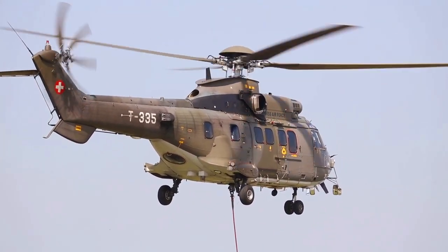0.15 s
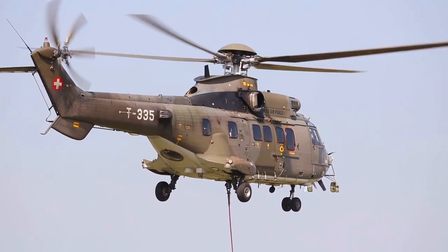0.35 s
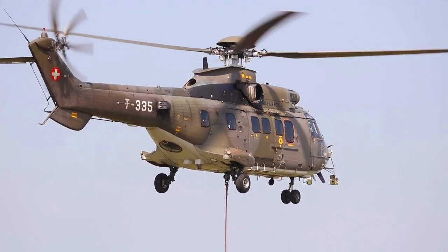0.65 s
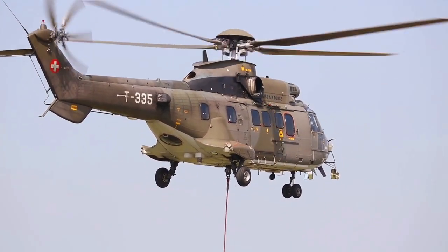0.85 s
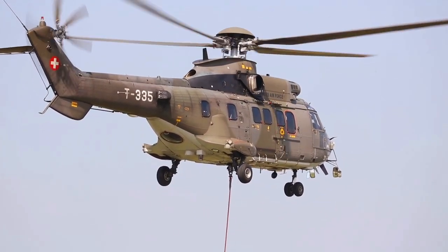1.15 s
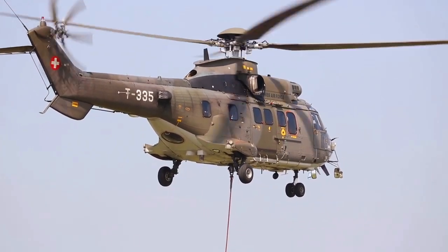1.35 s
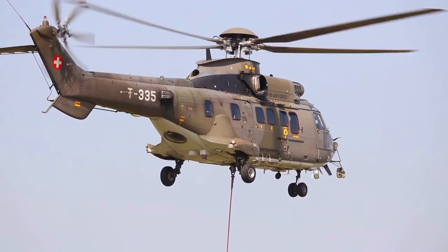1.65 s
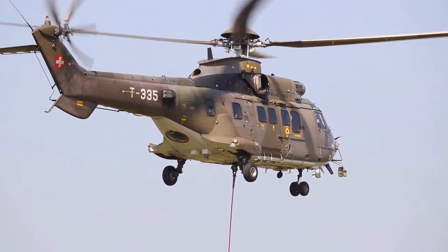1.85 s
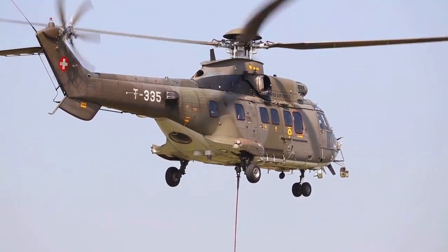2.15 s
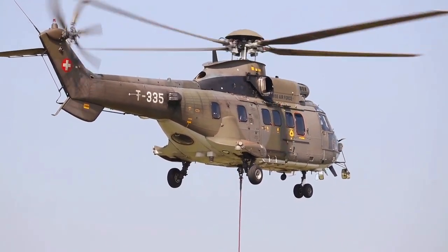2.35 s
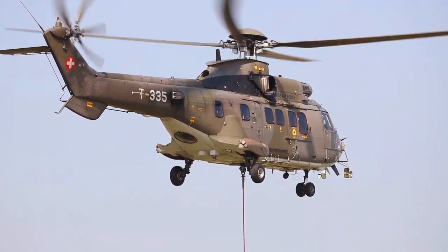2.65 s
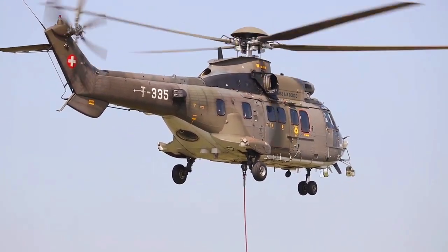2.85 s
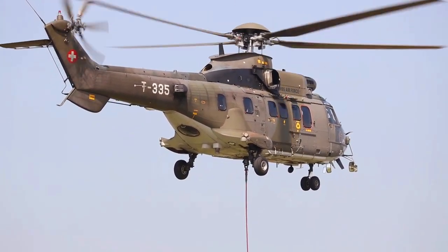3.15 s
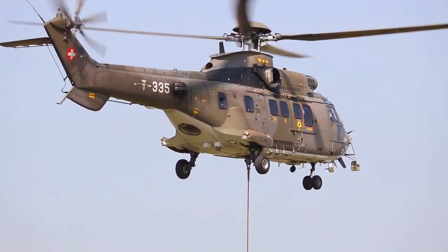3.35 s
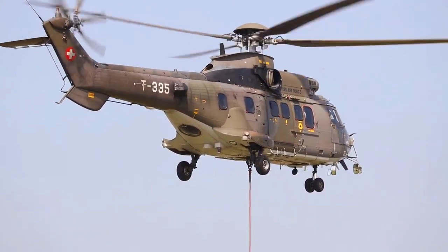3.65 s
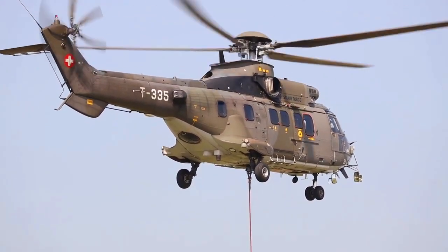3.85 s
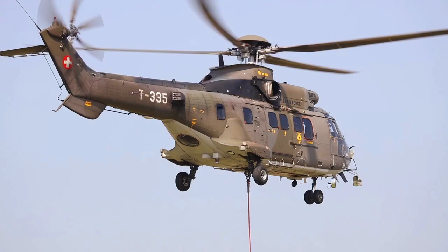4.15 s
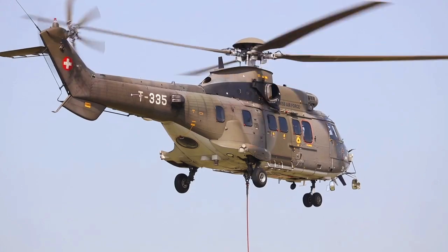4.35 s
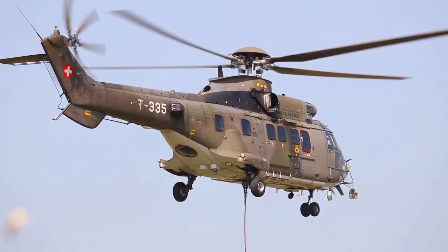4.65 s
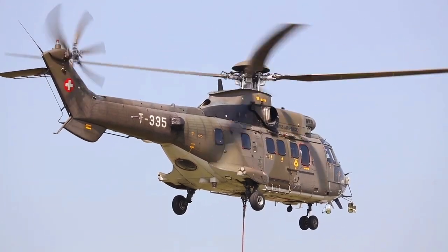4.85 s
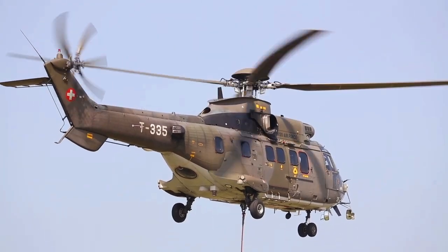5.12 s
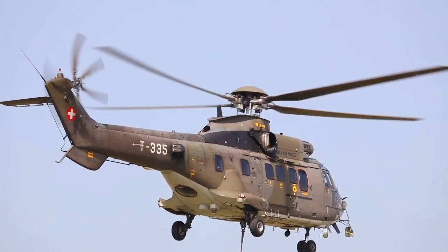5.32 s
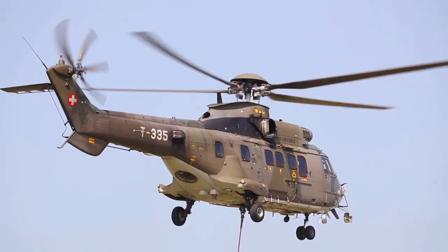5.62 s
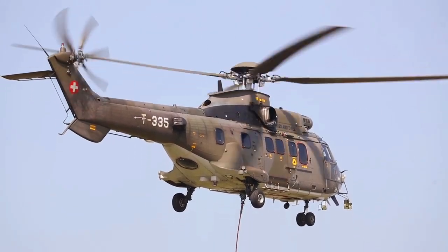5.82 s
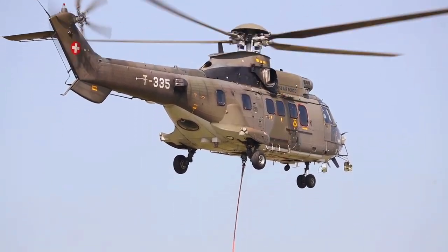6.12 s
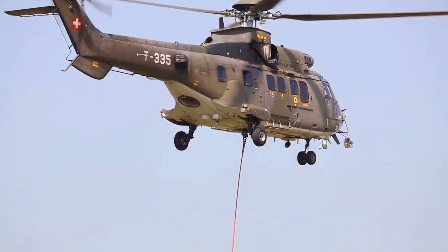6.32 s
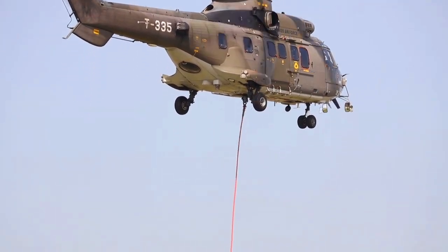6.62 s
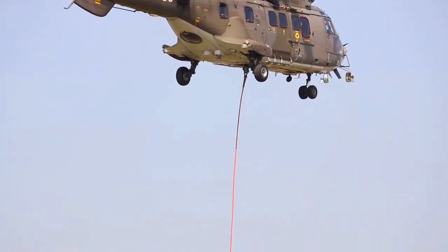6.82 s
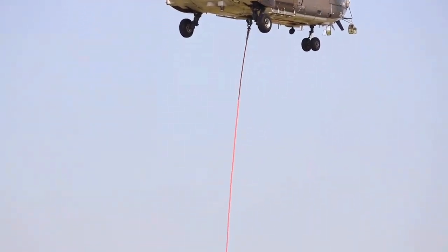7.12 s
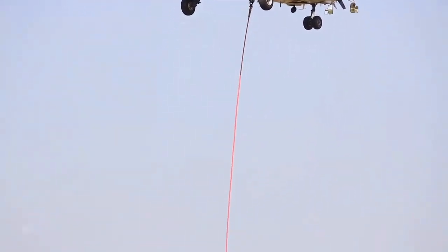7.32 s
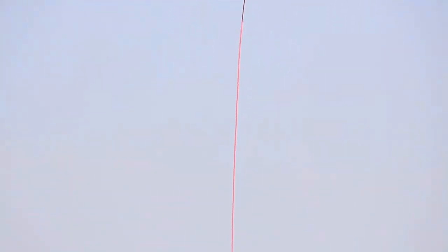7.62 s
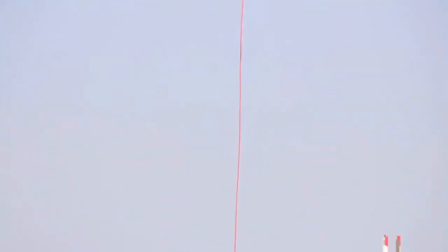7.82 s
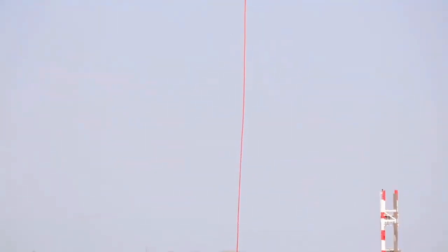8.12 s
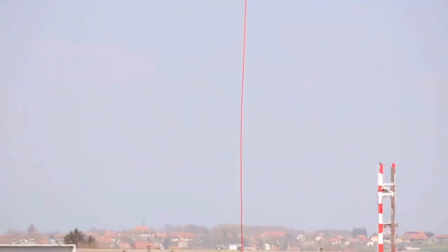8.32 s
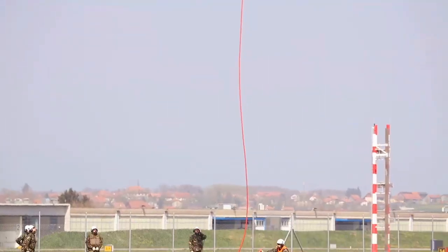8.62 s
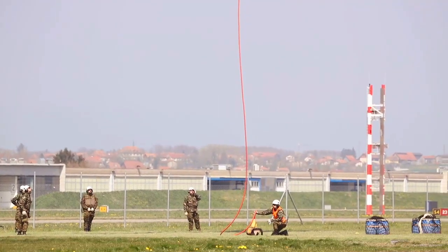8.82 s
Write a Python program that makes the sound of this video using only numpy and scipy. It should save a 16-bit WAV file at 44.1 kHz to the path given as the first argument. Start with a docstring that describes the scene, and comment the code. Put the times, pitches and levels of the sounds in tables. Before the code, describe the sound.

A twin-turbine helicopter hovers low over an airfield, its main rotor chopping out a loud, steady roar. The tail rotor hums and rasps under thin gearbox and turbine whines. Sharp blade slapping comes briefly early on, then in repeated bouts through the second half as the growl deepens. One microphone on the ground stands close enough for gusts of downwash to hit it with low thumps.

```python
"""A twin-turbine helicopter hovers low over an airfield and starts to climb, heard from the ground.
Its main blades chop a broad roar, growl, and slap when they meet their own tip vortices. The tail rotor
hums and rasps, the gearbox sings and the compressors whistle. An echo off the grass hollows the roar.
The single microphone stands close enough for the downwash to buffet it."""
import sys
import numpy as np
from scipy import signal
from scipy.fft import rfft, irfft, next_fast_len
from scipy.io import wavfile
from scipy.ndimage import uniform_filter1d, map_coordinates

SR = 44100
rng = np.random.default_rng(int(sys.argv[2]) if len(sys.argv) > 2 else 0)


def transcribe(signal):
    """Save signal, clipped to [-1, 1], as a 16-bit WAV file at the path in sys.argv[1]."""
    frames = np.atleast_2d(signal).T
    limited = np.clip(frames, -1, 1)
    pcm = np.round(limited * 32767).astype(np.int16)
    wavfile.write(sys.argv[1], SR, pcm)


N = 395577
BLADE_HZ, TAIL_HZ = 17.6, 106.03  # nominal blade passages a second: main rotor, tail rotor


def amp(db):
    """Decibels to gain."""
    return 10 ** (np.asarray(db) / 20)


def unit(x):
    """Scale to rms 1."""
    return x / np.sqrt(np.mean(x ** 2) + 1e-20)


def clock():
    """The time of every sample, in seconds."""
    return np.arange(N) / SR


def curves(rows):
    """One value per sample for each column after the time."""
    times, *columns = np.transpose(rows)
    return [np.interp(clock(), times, column) for column in columns]


def wobble(rate_hz):
    """A smooth random curve of rms near 1, with rate_hz knots a second."""
    knots = rng.standard_normal(int(N * rate_hz / SR) + 4)
    coarse = np.arange(0, N + 16, 16)
    return np.interp(np.arange(N), coarse, map_coordinates(knots, [coarse * rate_hz / SR]))


def hump(centre_s, length_s):
    """A smooth rise and fall of height 1; length_s is its width at half height."""
    return np.cos(np.pi / 2 * np.clip((clock() - centre_s) / length_s, -1, 1)) ** 2


def held(start_s, length_s, attack_s, release_s):
    """An envelope that rises to 1 at start_s, holds for length_s and dies away."""
    t = clock() - start_s
    fade = np.maximum(-t / attack_s, 0) + np.maximum((t - length_s) / release_s, 0)
    return np.exp(-np.minimum(fade, 20))


def passage(count, width):
    """A bump of height 1 at every whole blade count; width is a share of one passage."""
    return np.exp(-np.abs((count + .5) % 1 - .5) / width)


def blade_pulses(blade):
    """One impulse for each main blade."""
    return np.diff(np.floor(blade), prepend=np.floor(blade[0]))


def filtered(x, response):
    """x through a gain given as a function of frequency."""
    size = next_fast_len(N + SR // 2)
    return irfft(rfft(x, size) * response(np.fft.rfftfreq(size, 1 / SR)), size)[:N]


def low_passed(x, corner_hz, order):
    """x with the highs rolled off, 6 dB down at the corner."""
    return filtered(x, lambda hz: 1 / (1 + (hz / corner_hz) ** order))


def coloured(x, spectrum):
    """x through a spectrum of (freq_hz, gain_db) points, at rms 1."""
    freq_hz, gain_db = np.transpose(spectrum)
    return unit(filtered(x, lambda hz: amp(np.interp(np.log(hz + 1), np.log(freq_hz), gain_db))))


def resonant(x, bands):
    """x through parallel resonances of (centre_hz, width_hz, gain_db), at rms 1."""
    def response(hz):
        return sum(amp(db) * 1j * hz * width / (centre ** 2 - hz ** 2 + 1j * hz * width)
                   for centre, width, db in bands)
    return unit(filtered(x, response))


def rush(spectrum, patchy_db):
    """Noise of rms 1 whose bands fade in and out in the turbulent air."""
    bands = signal.stft(rng.standard_normal(N), nperseg=1024)[2]
    patches = uniform_filter1d(rng.standard_normal(bands.shape), size=5, axis=0)
    patches = unit(uniform_filter1d(patches, size=14, axis=1))
    noise = signal.istft(bands * amp(patchy_db * patches), nperseg=1024)[1][:N]
    return coloured(noise, spectrum)


def narrow(pitch_hz, width_hz):
    """A tone of rms 1 that the moving air smears into a narrow band."""
    phase = 2 * np.pi * np.cumsum(pitch_hz * np.ones(N)) / SR
    return unit(wobble(width_hz) * np.cos(phase) + wobble(width_hz) * np.sin(phase))


def downwash():
    """Gusts ride on a restless breeze and break on the microphone in low lumps; large eddies add bass."""
    # steady downwash at the microphone: time_s, level_db, bass_db
    breeze = [(0, -22, -5), (.7, -24, 1), (1.5, -24, -12), (2.2, -22, -7), (2.38, -23.5, 0),
              (2.6, -26.5, -0.5), (3.3, -27, 0), (4.3, -26.5, -2), (5.2, -27, 3.5), (5.7, -19.5, -2),
              (6.7, -29, 11.5), (7.25, -22, -2), (7.7, -36.5, 2), (8.97, -32, 6)]
    # gusts on top of it: start_s, length_s, level_db, bass_db
    gusts = [(0.288, .23, -19.5, 0), (2.11, 0.11, -18.5, -5), (2.422, 0.11, -13, 3.5),
             (2.548, 0.037, -10, -3), (2.648, 0.08, -17.5, 3), (2.864, 0.17, -16.5, -1),
             (3.037, 0.069, -19, 6), (3.728, 0.09, -19, 2), (3.854, 0.078, -16, 4.5),
             (3.994, 0.04, -18.5, 2), (5.337, 0.023, -15, 3), (5.376, 0.041, -7.5, 3.5),
             (5.439, 0.008, -12.5, 6), (5.473, 0.049, -12, -11), (5.556, 0.044, -24.5, 10.5),
             (5.749, 0.14, -13, -4), (5.925, 0.05, -14.5, -2), (6.1, 0.04, -19, 7), (6.259, 0.064, -14, 2),
             (6.443, 0.13, -14.5, -2.5), (6.609, 0.05, -17.5, 2), (6.852, 0.093, -17, 0)]
    # spectrum of wind on the microphone: freq_hz, gain_db
    buffet = [(15, -61), (30, -27.5), (55, -12), (100, -7), (160, -1.5), (240, -2), (340, -2.5),
              (450, -9.5), (700, -14), (1500, -26.5), (4000, -41.5), (9000, -74.5)]
    breeze_db, breeze_bass_db = curves(breeze)
    flows = [(amp(breeze_db + 1.5 * wobble(16)), breeze_bass_db)]
    for start, length, db, bass_db in gusts:
        flows.append((amp(db) * held(start, length, attack_s=.012, release_s=.016), bass_db))
    small = np.sqrt(sum(flow ** 2 for flow, _ in flows))
    large = np.sqrt(sum((flow * amp(bass_db)) ** 2 for flow, bass_db in flows))
    lumps = unit(amp(0.97 * wobble(45)))
    eddies = rush(buffet, patchy_db=2.2)
    bass = low_passed(eddies, corner_hz=165, order=6)
    return lumps * (small * (eddies - bass) + large * bass)


def thuds():
    """The heaviest eddies hit the microphone as short, low, unsteady throbs; small sharp ones pop."""
    # heavy eddies: centre_s, length_s, pitch_hz, level_db
    heavy_eddies = [(0.334, 0.014, 252, -12.5), (2.133, 0.021, 243, -13.5), (2.423, 0.021, 256, -10.5),
                    (2.495, 0.02, 240, -16), (2.554, 0.035, 208, -8.5), (3.741, 0.0099, 200, -14),
                    (3.92, 0.012, 304, -18), (4.021, .014, 228, -14), (5.344, 0.014, 166, -5.5),
                    (5.386, 0.012, 254, -4), (5.426, 0.0077, 284, -8.5), (5.496, 0.009, 230, -12),
                    (6.887, 0.031, 163, -10)]
    # sharp eddies: centre_s, length_s, level_db
    sharp_eddies = [(0.313, 0.01, -16), (2.583, .004, -10), (3.764, 0.0066, -15), (5.354, .004, -13),
                    (5.383, 0.0062, -6.5)]
    # spectrum of a pop: freq_hz, gain_db
    pop_spectrum = [(100, -12), (300, 0.5), (700, 5), (1300, -18.5), (3000, -18.5), (9000, -49)]
    low_cut_hz = 116
    waver_rad = 0.47 * wobble(170)
    throbs = 0
    for centre, length, pitch_hz, db in heavy_eddies:
        phase = 2 * np.pi * pitch_hz * (clock() - centre) + waver_rad
        throbs += amp(db) * hump(centre, length) * np.sqrt(2) * np.sin(phase)
    pop_level = sum(amp(db) * hump(centre, length) for centre, length, db in sharp_eddies)
    pops = pop_level * coloured(rng.standard_normal(N), pop_spectrum)
    return filtered(throbs, lambda hz: hz ** 4 / (hz ** 4 + low_cut_hz ** 4)) + pops


def machinery():
    """Gear meshes and compressor blades give narrow, fluttering whines."""
    # gear meshes and the farther compressor: pitch_hz, width_hz, level_db
    steady_tones = [(1256, 10, -39), (1675, 18, -43.5), (2030, 40, -48.5), (9570, 190, -58)]
    # the engines' lower whine: time_s, level_db
    shrill_levels = [(0, -49), (.45, -46), (1.3, -54), (2.3, -72), (3.45, -51), (4.8, -65), (5.7, -45.5),
                     (6.3, -45), (7.3, -53), (8.97, -59)]
    # the nearer compressor: time_s, pitch_hz, level_db
    near_compressor = [(0, 9440, -65), (1.7, 9420, -70), (4.8, 9385, -66), (5.5, 9360, -57),
                       (6.1, 9370, -53), (6.7, 9400, -56), (7.4, 9400, -57), (8.97, 9390, -66)]
    whistle_hz, whistle_db = curves(near_compressor)
    whines = sum(amp(db) * narrow(hz, width) for hz, width, db in steady_tones)
    shrill = amp(curves(shrill_levels)[0] + 1.5 * wobble(12)) * narrow(pitch_hz=4240, width_hz=340)
    whistle = amp(whistle_db + 2.5 * wobble(11)) * narrow(whistle_hz, width_hz=125)
    return whines + shrill + whistle


def drone(blade, tail):
    """Steady blade loading: the tail rotor hums, wavering in the main wake; each main blade thumps."""
    # drone of the two rotors: time_s, tail_db, main_db
    levels = [(0, -26.5, -30), (.5, -22.5, -26), (1.25, -26, -31.5), (1.7, -32.5, -30), (2.2, -27.5, -24),
              (2.6, -21, -25), (3, -23.5, -25), (3.35, -20.5, -36), (3.8, -29.5, -24), (4.3, -36.5, -28),
              (5.1, -44.5, -28.5), (6.3, -26, -29), (7.1, -40, -33), (7.7, -37.5, -32), (8.97, -47, -32)]
    # tail harmonics, each with a side tone one main blade rate above: multiple, gain_db, side_ratio
    harmonics = [(1, -10, 0.27), (2, -1.5, 0.51), (3, -11.5, 1.36)]
    # bands in which the main blade pulses drone: centre_hz, width_hz, gain_db
    thump_bands = [(115, 46, -8.5), (227.8, 28.5, 1.5), (336.7, 16.4, -2.5)]
    tail_db, main_db = curves(levels)
    wake_lag = 0.34  # share of a passage that the wake needs to reach the tail rotor
    wake = 2 * np.pi * (blade - wake_lag) + .5 * wobble(4.6)
    hum = 0
    for multiple, db, side_ratio in harmonics:
        phase = 2 * np.pi * round(multiple) * tail + 0.69 * wobble(18)
        level = np.sqrt(2) * amp(db + 1.7 * wobble(16))
        hum += level * (np.sin(phase) + side_ratio * np.sin(phase + wake))
    pulses = unit(blade_pulses(blade) * amp(2.4 * wobble(18)))
    churn = unit(rng.standard_normal(N) * passage(blade, width=0.81))  # each blade meets different air
    thump = low_passed(resonant(pulses + 0.84 * churn, thump_bands), corner_hz=520, order=4)
    return amp(tail_db) * hum + amp(main_db) * unit(thump)


def growl(blade):
    """Every main blade repeats the same rough sweep: stacked harmonics sound in a few hollow bands."""
    # the growl at the microphone: time_s, level_db
    levels = [(0, -37), (1.7, -39.5), (2.6, -33), (3.4, -36), (4.2, -37), (5.1, -31.5), (6, -29.5),
              (7.1, -29.5), (7.8, -25.5), (8.2, -31.5), (8.7, -26.5), (8.97, -27.5)]
    # its hollow bands: centre_hz, width_hz, gain_db
    bands = [(168, 35, -3), (374, 7.4, 0), (478.5, 34, 1.5), (603, 28, -2), (671, 40, 0), (896, 30, -0.5),
             (1002, 49, -10.5)]
    sweep = irfft(np.exp(2j * np.pi * rng.random(size=256)))
    repeated = unit(np.interp(blade % 1, np.arange(len(sweep)) / len(sweep), sweep, period=1))
    waver = amp(0.95 * wobble(9))
    turbulence = 0.43 * rush([(100, 7), (1500, -2), (3000, -20)], patchy_db=4.0)
    return amp(curves(levels)[0]) * resonant(repeated * waver + turbulence, bands)


def ground_echo(direct):
    """The direct sound meets its late, duller copy from the grass, which cancels some pitches."""
    # the bounce off the ground: time_s, delay_ms, strength_ratio
    bounce = [(0, 0.61, 0.079), (.8, 0.62, 0.3), (1.8, 0.8, 0.28), (2.8, 0.55, 0.068), (3.1, 0.7, 0.055),
              (3.5, 1.25, 0.1), (4, 1.1, 0.036), (4.4, 1.4, 0.12), (4.9, 1.466, 0.36), (5.3, 1.5, 0.061),
              (7, 1.95, 0.073), (7.8, 1.43, 0.19), (8.97, 1.84, 0.074)]
    delay_ms, strength = curves(bounce)
    dull = low_passed(direct, corner_hz=2600, order=2)
    late = np.interp(clock() - delay_ms / 1000, clock(), dull)
    return (direct + strength * late) / np.sqrt(1 + strength ** 2)


def roar_noise():
    """The rotor's broad turbulence changes colour as the aircraft drifts and rises."""
    # spectrum in the hover: freq_hz, gain_db
    hover_spectrum = [(60, -15), (120, 4), (290, -5), (420, 0), (490, 2), (540, 0.5), (680, 3), (785, -8),
                      (870, -2), (960, 0.5), (1090, -1), (1230, 0.5), (1480, -9), (1700, -8.5), (2000, -18),
                      (3000, -31.5), (6000, -62)]
    # spectrum in the climb: freq_hz, gain_db
    climb_spectrum = [(60, -22.5), (110, 1.5), (190, 3), (290, -5.5), (530, -4), (720, -0.5), (840, -2.5),
                      (1000, -5), (1270, 0.5), (1480, -7.5), (1680, -2.5), (2000, -20.5), (3000, -15.5),
                      (6000, -56)]
    # blend of the two: time_s, climb_share
    blend = [(1.8, 0.0038), (2.4, 0.49), (4, 0.57), (4.4, 0.87), (5.3, 0.98), (5.7, 0.33), (6.8, 0.51),
             (7.5, 0.95)]
    climb_share = np.clip(curves(blend)[0], 0, 1)
    hover = np.sqrt(1 - climb_share) * rush(hover_spectrum, patchy_db=2.5)
    climb = np.sqrt(climb_share) * rush(climb_spectrum, patchy_db=2.0)
    return hover + climb


def tip_noise():
    """Air rushes off the blade tips; its treble brightens and dulls."""
    # spectrum of the swish: freq_hz, gain_db
    spectrum = [(600, -30), (1400, 2.5), (2000, 3.5), (2600, 0), (3000, -3), (3450, -7), (4100, -10.5),
                (4800, -17), (7000, -23), (10000, -32)]
    # its treble above about 3 kHz: time_s, gain_db
    brightness = [(0, 1), (1.4, 2.5), (2.2, -3), (3.5, -0.5), (4.7, 2), (5.8, -2), (6.8, -11), (7.6, 0.5),
                  (8.1, 8), (8.45, 7.5), (8.97, 8)]
    tips = rush(spectrum, patchy_db=2.3)
    dull = low_passed(tips, corner_hz=3100, order=8)
    return dull + amp(curves(brightness)[0]) * (tips - dull)


def rotor_air(blade, tail):
    """Turbulence leaves the blades: it swells with each main blade and is chopped by the tail rotor."""
    # air noise of the rotors between wind swells: time_s, roar_db, hiss_db
    levels = [(0, -24.5, -43.5), (.4, -23, -42.5), (1.05, -24.5, -45), (1.65, -27, -45),
              (2.15, -21.5, -44.5), (2.75, -25.5, -43), (3.45, -22, -40.5), (3.8, -25, -42),
              (4.1, -23, -42.5), (4.7, -23, -42.5), (5.08, -29, -44), (5.3, -23, -44.5), (5.55, -22, -40.5),
              (6.1, -23.5, -39), (6.45, -21, -40), (6.9, -21, -38), (7.75, -25, -41.5), (8.97, -23.5, -45)]
    # the wind carries the swish over to the microphone: crest_s, length_s, rise_db
    wind_swells = [(0.473, 0.069, 7.5), (0.764, 0.21, 7), (1.407, 0.33, 4.5), (2.013, 0.65, 7.5),
                   (2.57, 0.099, 5.5), (3.002, 0.22, 5), (3.449, .05, 3), (3.602, 0.13, 4.5),
                   (4.047, 0.068, 6), (4.606, 0.3, 4.5), (5.473, 0.24, 4.5), (5.783, 0.21, 4),
                   (6.795, 0.81, 3.5), (7.542, 0.13, 6.5), (8.08, 0.069, 4), (8.41, 0.051, 5)]
    # spectrum of the tail rotor's hiss: freq_hz, gain_db
    hiss_spectrum = [(1500, -16), (3200, 8.5), (5000, 2.5), (6500, 0.5), (8000, -0.5), (9100, -5),
                     (9700, -20), (10200, -24)]
    roar_db, hiss_db = curves(levels)
    swish_db = hiss_db + 10.5
    carried_db = sum(db * hump(crest, length) for crest, length, db in wind_swells)
    swell = amp(.5 * np.cos(2 * np.pi * blade) + 0.48 * wobble(25))
    chop = passage(tail, width=0.25)
    rasp = amp(2.5 * wobble(2.8))
    roar = unit(roar_noise() * swell * (1 + 0.44 * chop))
    swish = unit(tip_noise() * swell * (1 + 2.0 * chop))
    hiss = unit(rush(hiss_spectrum, patchy_db=1.4) * (1 + 0.53 * rasp * chop))
    return (roar * amp(roar_db + 0.08 * carried_db)
            + swish * amp(swish_db + carried_db)
            + hiss * amp(hiss_db + 0.21 * carried_db))


def blade_slap(blade):
    """A blade cuts the vortex of the one before it: a sharp pressure pulse inside a ragged burst."""
    # bouts of slapping: start_s, length_s, level_db, ring_db
    bouts = [(1.814, .8, -21, -49), (4.356, .4, -22.5, -30.5), (4.834, 0.11, -17, -45),
             (5.03, 0.48, -21.5, -34.5), (5.746, 0.64, -23, -29), (6.575, 0.31, -22.5, -51),
             (6.95, 0.37, -25, -41), (8.436, 0.65, -19.5, -49)]
    # single blades that hit a vortex hard: centre_s, level_db, added_edge_db, glancing_share
    hard_hits = [(4.354, -19.5, -2, .5), (4.41, -17, 3, .1), (4.467, -12, 3, .1), (4.527, -20, 5.5, 1),
                 (4.643, -18, 1.5, 0.8), (4.697, -16.5, .5, 0.7), (4.757, -21, 0, 0.5), (4.927, -27, 5, 0),
                 (4.984, -15.5, 2, 0), (5.042, -25.5, 7.5, 0), (5.381, -19, 6, 0), (6.635, -15.5, 1.5, .3),
                 (6.694, -11.5, 0, 0.03), (6.75, -18, -0.5, 0.03), (6.81, -15.5, -0.5, .1),
                 (6.868, -19, -1, .1), (6.923, -15.5, -1, 0), (8.626, -18, 7, .3), (8.682, -20, 13, .1),
                 (8.738, -21, 15, 0.6), (8.797, -20.5, 2, .3), (8.852, -20.5, 3, 0.5),
                 (8.908, -15.5, 3.5, 0.6)]
    # spectrum of a slap's body: freq_hz, gain_db
    body_spectrum = [(120, -18.5), (350, 2.5), (560, 4.5), (700, 8), (900, 7), (1350, 7.5), (2200, 4.5),
                     (3100, -4.5), (4500, -22.5), (9000, -47)]
    # spectrum of its bright edge: freq_hz, gain_db
    edge_spectrum = [(1500, -19), (2600, 12), (4200, 5.5), (6000, -2.5), (9500, -15.5)]
    # its low knock and hollow ring: centre_hz, width_hz, gain_db
    knock_bands = [(340, 100, -4.5), (686, 79, -3.5)]
    power, edge_db = amp(-33) ** 2, -21.5  # the faint slap outside the bouts
    ring, smear = 0, 0
    for start, length, db, ring_db in bouts:
        bout = held(start, length, attack_s=0.088, release_s=0.05)
        power += (amp(db) * bout) ** 2
        ring += amp(ring_db) * bout
    for centre, db, added_edge_db, glancing in hard_hits:
        hit = hump(centre, length_s=.05)  # about one blade passage
        power += (amp(db) * hit) ** 2
        edge_db += added_edge_db * hit
        smear += glancing * hit
    sharp = np.clip(1 - smear, 0, 1)  # a glancing hit is longer and softer
    crack = passage(blade + .014 * wobble(22), width=0.023)
    burst = passage(blade, width=0.089 * (2 - sharp)) + 0.3 * sharp * crack
    ragged = unit(amp(3.3 * wobble(450)))
    body = coloured(rng.standard_normal(N) * ragged, body_spectrum)
    edge = coloured(rng.standard_normal(N) * ragged, edge_spectrum) * amp(edge_db)
    pulse = sharp * amp(-22.5) * coloured(-blade_pulses(blade), body_spectrum)
    slap = ((body + edge) * burst + pulse) * np.sqrt(power)
    knock = ring * resonant(body * burst + pulse, knock_bands)
    return (slap + knock) * amp(0.52 * wobble(21))


def scene():
    """Both rotors turn at governed speed; drifting of the aircraft shifts their beat a little."""
    # where in its passage a main blade is loudest: time_s, lag_passages
    blade_lag = [(0, .36), (1, .43), (2, .5), (2.6, .5), (3.2, .67), (4.45, .66), (4.7, .68), (5, .73),
                 (5.27, .81), (5.38, .76), (6.5, .76), (6.75, .82), (6.85, .86), (8.4, .81), (8.97, .79)]
    blade = BLADE_HZ * clock() - curves(blade_lag)[0]  # running count of blade passages
    tail = TAIL_HZ * clock() + 0.13 * wobble(2.44)
    rotors = ground_echo(rotor_air(blade, tail) + blade_slap(blade))
    helicopter = rotors + drone(blade, tail) + growl(blade) + machinery()
    return (helicopter + downwash() + thuds())[None]


def record(dry):
    """The loudest thumps are clipped and crunch slightly; everything above 10 kHz is cut off."""
    cutoff_hz = 10000
    clipped = dry[0] / (1 + np.abs(dry[0]) ** 8) ** (1 / 8)
    return filtered(clipped, lambda hz: hz < cutoff_hz)[None]


dry = scene()
out = record(dry)
transcribe(out)
```